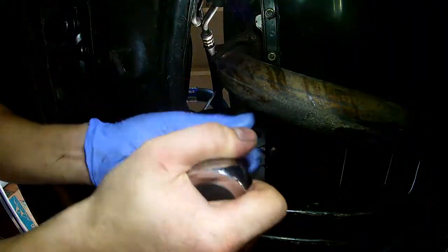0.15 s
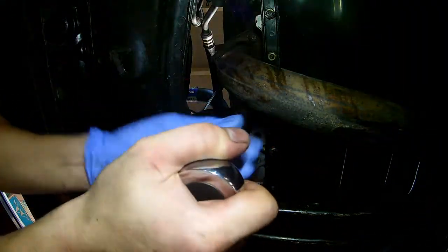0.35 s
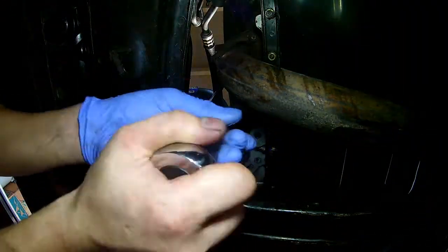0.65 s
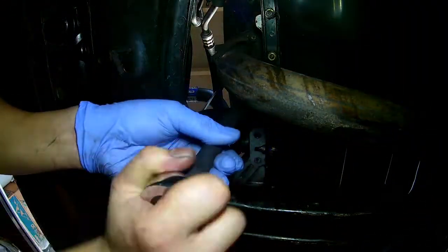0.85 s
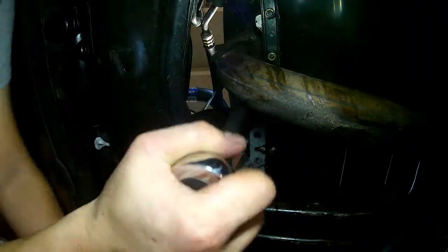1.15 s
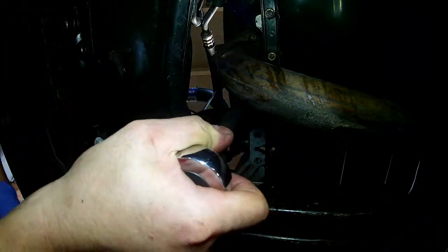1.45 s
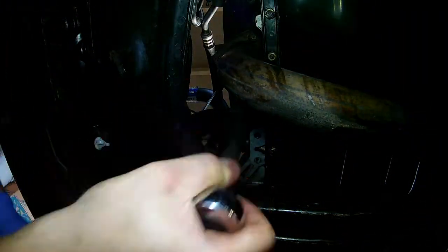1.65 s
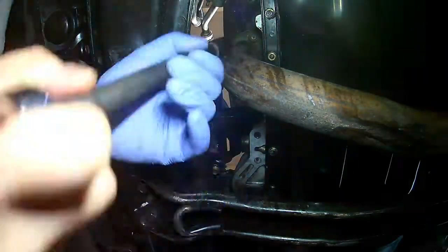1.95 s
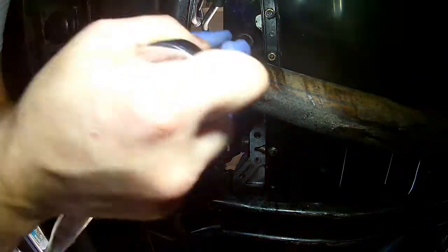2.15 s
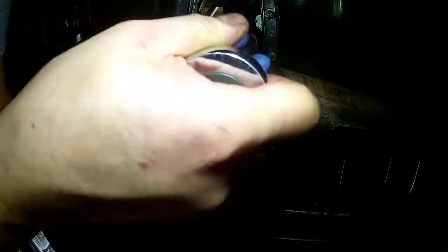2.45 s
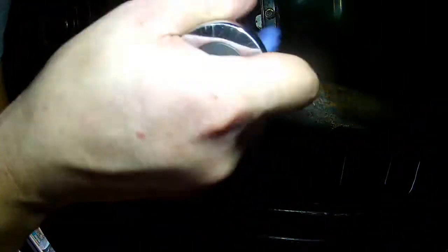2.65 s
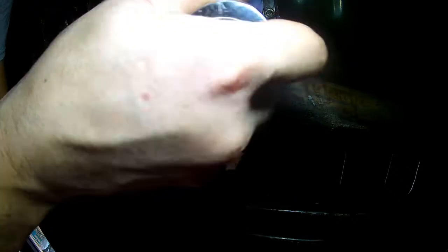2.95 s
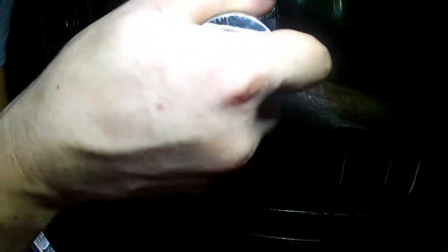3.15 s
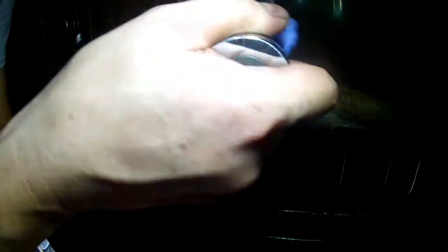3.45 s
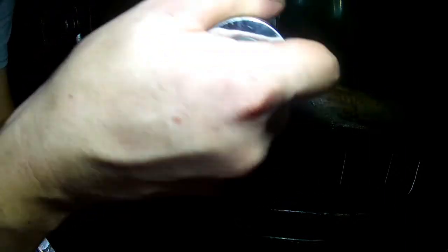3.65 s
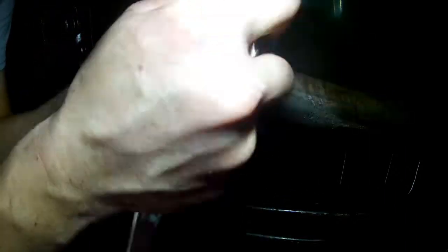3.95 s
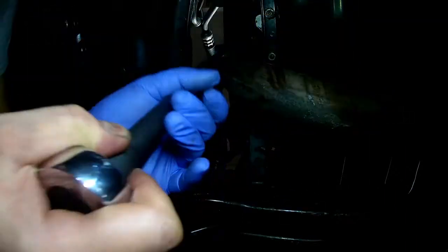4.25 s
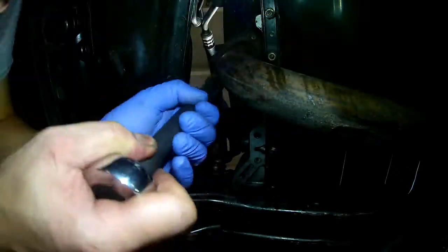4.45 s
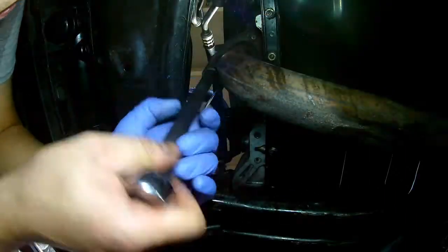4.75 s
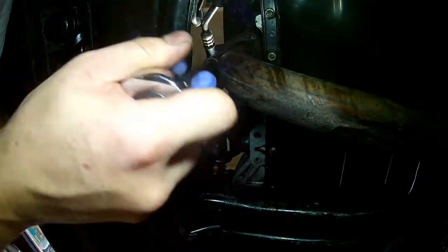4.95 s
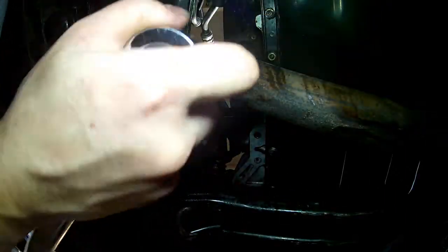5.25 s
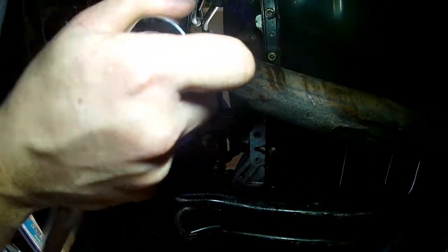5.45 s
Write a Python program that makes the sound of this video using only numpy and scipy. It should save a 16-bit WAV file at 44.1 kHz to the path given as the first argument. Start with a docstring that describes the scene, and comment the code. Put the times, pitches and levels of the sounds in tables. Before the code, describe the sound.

Time-lapse work under a car: scattered clicks of ratchet teeth, a dull knock, a sudden metallic clang, small squeaks and knocks, then a busy rattling run of clicks and rasps. Another clang cuts it off; thuds and a few last clicks follow. Low engine hum and a faint rising car whine lie behind a cheap, close microphone.

```python
"""A ratchet wrench works under a car in a garage: its pawl clicks over the teeth, metal rubs, the socket
knocks and twice clangs on the chassis. Time runs fast: only short pieces are kept and cross-faded, so every
click, knock and clang is cut off where its piece ends. Far traffic rumbles outside and a car pulls away.
Noise bursts and steady noise through resonances make the metal, sines the clangs, engine and gear whine;
the microphone housing cuts two treble bands and the electronics hiss."""
import sys
import numpy as np
from scipy.fft import rfft, irfft, next_fast_len
from scipy.io import wavfile
from scipy.ndimage import uniform_filter1d, map_coordinates

SR = 44100
rng = np.random.default_rng(int(sys.argv[2]) if len(sys.argv) > 2 else 0)


def unload_wav(signal):
    """Save mono or channel-first audio to the path in sys.argv[1] as 16-bit WAV at rate SR, clipped to [-1, 1]."""
    wavfile.write(
        sys.argv[1],
        SR,
        np.round(np.clip(np.atleast_2d(signal).T, -1, 1) * 32767).astype(np.int16),
    )


N = 247401

STEP, FIRST, FADE = .042, -.026, .008  # piece spacing, first start, cross-fade (s)
COUNT, SIZE = 135, 4096  # pieces, samples worked out for each
T = np.arange(SIZE) / SR  # time within a piece (s)
HZ = np.fft.rfftfreq(SIZE, 1 / SR)


def amp(db):
    """Amplitude factor of a level in dB."""
    return 10 ** (np.asarray(db) / 20)


def along(points, hz):
    """Values at hz between (Hz, value) points on a log frequency axis."""
    point_hz, value = np.transpose(points)
    return np.interp(np.log(hz + 1), np.log(point_hz + 1), value)


def coloured(x, gain):
    """Rows through a causal minimum-phase filter with the shape of gain, scaled to energy 1."""
    cepstrum = irfft(np.log(gain + 1e-5 * gain.max()), SIZE)
    # folding the cepstrum forward in time makes the filter causal
    cepstrum[..., 1:SIZE // 2] *= 2
    cepstrum[..., SIZE // 2 + 1:] = 0
    response = np.exp(rfft(cepstrum))
    size = np.sqrt(np.mean(gain ** 2, axis=-1, keepdims=True))
    return irfft(rfft(x) * response / size, SIZE)


def place(s, early):
    """The piece that holds a moment, and time since it; early (s) in a cross-fade the ending piece holds it."""
    k = int((s - FIRST - early) / STEP)
    return k, np.maximum(T - (s - FIRST - k * STEP), 0)


def spliced(pieces):
    """Each piece keeps one step plus the fade and overlaps the next."""
    window = np.clip(np.minimum(T, STEP + FADE - T) / FADE, 0, 1)
    start = np.round(np.arange(COUNT) * STEP * SR).astype(int)
    index = start[:, None] + np.arange(SIZE)
    joined = np.bincount(index.ravel(), (pieces * window).ravel())
    return joined[round(-FIRST * SR):][:N]


def wash(db, spectrum):
    """Noise that starts anew in every piece, at a slightly new level."""
    gain = amp(db + rng.normal(0, .9, COUNT))[:, None]
    return gain * coloured(rng.standard_normal((COUNT, SIZE)), amp(along(spectrum, HZ)))


def note(table, rate, pitch_waver, waver_db):
    """One far sine tone that wavers in pitch (fraction) and strength, rate times a second."""
    s, hz, db = np.transpose(table)
    t = np.arange(N) / SR
    pitch_drift, level_drift = (map_coordinates(rng.standard_normal(1000), [t * rate]) for _ in range(2))
    pitch = np.interp(t, s, hz) * (1 + pitch_waver * pitch_drift)
    level = amp(np.interp(t, s, db) + waver_db * level_drift)
    return level * np.sin(2 * np.pi * np.cumsum(pitch) / SR)


def modes(table, between_db, scatter_db, ripple_db):
    """Resonance peaks over a rippled base of many small modes, at new strengths in each piece."""
    ripple = uniform_filter1d(rng.standard_normal((COUNT, len(HZ))), size=6) * np.sqrt(6)
    gain = np.full(ripple.shape, amp(between_db))
    for hz, width, db in table:
        strength = amp(db + rng.normal(0, scatter_db, (COUNT, 1)))
        gain += strength / np.hypot(1, 2 * (HZ - hz) / width) ** 2
    return gain * amp(ripple_db * ripple)


def blows(times, dbs, t60, tail_db, tail_t60, rise, early=.003):
    """Noise bursts in their pieces: faint noise swells into a short crack, then a ring dies more slowly."""
    out = np.zeros((COUNT, SIZE))
    for s, db in zip(times, dbs):
        k, t = place(s, early)
        lead = amp(-19.5) * np.exp(-np.abs(T - (s - FIRST - k * STEP)) / 0.0026)
        crack = amp(-60 * t / t60)
        ring = amp(tail_db - 60 * t / tail_t60)
        out[k] += amp(db) * ((crack + ring) * (1 - np.exp(-t / rise)) + lead)
    return out * rng.standard_normal(out.shape) * (T < STEP + FADE)


def steady(starts, dbs, swell_db):
    """Grainy noise that lasts through the named pieces, swelling or fading across each."""
    gain = np.zeros((COUNT, SIZE))
    across = np.clip(T / (STEP + FADE), 0, 1) - .5
    piece = np.round((starts - FIRST) / STEP).astype(int)
    gain[piece] = amp(dbs[:, None] + swell_db[:, None] * across)
    grain = uniform_filter1d(rng.standard_normal((COUNT, SIZE)), size=130) * np.sqrt(130)  # about 3 ms
    return gain * amp(2.2 * grain) * rng.standard_normal((COUNT, SIZE))


# Drone of far engines outside the garage. Each row: time in seconds, level in dB.
DRONE_LEVEL = [(0, -47), (1.3, -41.5), (3.4, -42.5), (4.08, -43), (4.44, -42.5), (5.05, -45.5), (5.61, -50)]
# Colours of the drone, the rumble and the tyre wash. Each row: frequency in Hz, relative density in dB per Hz.
DRONE_COLOUR = [(7.1, -49), (12, -17), (27, -3.5), (80, 2), (105, -4.5), (124, -7.5), (150, -2), (200, -35),
                (330, -120)]
RUMBLE_COLOUR = [(76, -30.5), (130, -5.5), (188, -5), (269, -10.5), (450, -20.5), (580, -40), (990, -120)]
TYRES_COLOUR = [(240, -31.5), (400, -8.5), (518, -3.5), (665, -11), (797, -2.5), (862, -3), (1260, -13.5),
                (1430, -13), (1730, -18.5), (1800, -19), (2600, -48), (3380, -75), (5720, -120)]
RUMBLE_DB, TYRES_DB = -43, -47


def traffic():
    """Far traffic outside: three bands of noise, engine drone, rumble and tyre wash."""
    middle = FIRST + (np.arange(COUNT) + .5) * STEP
    drone = wash(np.interp(middle, *np.transpose(DRONE_LEVEL)), DRONE_COLOUR)
    return drone + wash(RUMBLE_DB, RUMBLE_COLOUR) + wash(TYRES_DB, TYRES_COLOUR)


# A far engine's low note. Each row: time in seconds, centre pitch in Hz, centre level in dB.
ENGINE_NOTE = [(0, 91, -42), (.2, 74.7, -41.5), (.48, 97.2, -38), (.72, 96.6, -38.5), (.81, 75.65, -37.5),
               (1.11, 75, -31), (1.2, 87.3, -39), (1.5, 88.9, -39.5), (2.1, 97.9, -42), (2.9, 98.5, -46),
               (3.75, 108.3, -36), (4.05, 98.3, -41.5), (4.5, 111.7, -38), (5.61, 98.5, -38.5)]


def far_engine():
    """A far engine hums as one low, unsteady sine."""
    return note(ENGINE_NOTE, 30, .13, 2.5)


# A car pulls away through two gears. Each row: start in seconds, length in seconds, first pitch in Hz,
# last pitch in Hz, level in dB before the fades.
GEARS = [(1.849, 0.79, 1027, 1498, -49), (3.253, 1.02, 1033, 1630, -54)]
WHINE_RISE, WHINE_IN_S, WHINE_FADE_DB = 4.3, 0.13, 18  # how early pitch levels off, fade at each end, loss by the end


def gears():
    """Rows (s, Hz, dB): in each gear the pitch climbs fast, then levels off while the whine fades."""
    u = np.linspace(0, 1, num=30)
    climb = (1 - np.exp(-WHINE_RISE * u)) / (1 - np.exp(-WHINE_RISE))
    rows = []
    for s, length, low, high, db in GEARS:
        ends = np.clip(np.minimum(u, 1 - u) * length / WHINE_IN_S, 1e-3, 1)
        level_db = db - WHINE_FADE_DB * u ** 2 + 20 * np.log10(ends)
        rows.append((s + u * length, low + (high - low) * climb, level_db))
    return np.hstack(rows).T


def car_pulling_away():
    """The gear whine of the car is one sine that wavers about the climbing pitch."""
    return note(gears(), 80, 0.0245, 3.6)


# Narrow rings and squeaks. Each row: start of the first piece in seconds, number of pieces,
# centre frequency in Hz, width in Hz, centre level in dB.
SQUEAK_RINGS = [(1.78, 1, 3890, 130.4, -54), (1.864, 1, 3300, 91.5, -58), (1.948, 4, 3660, 129.7, -58),
                (2.116, 1, 3605, 98.8, -52), (1.948, 5, 11610, 400, -74), (2.032, 1, 5840, 200, -57),
                (4.51, 1, 10360, 404, -66), (5.392, 1, 581.4, 130, -46), (5.518, 3, 647, 190, -40)]
SQUEAK_WAVER, SQUEAK_SCATTER_DB = 0.011, 2  # from piece to piece: pitch (fraction), level


def squeaks():
    """Noise through one resonance, at a slightly new pitch and strength in each piece."""
    out = np.zeros((COUNT, SIZE))
    for s, pieces, hz, width, db in SQUEAK_RINGS:
        waver, size = rng.standard_normal((2, round(pieces), 1))
        centre_hz = hz * (1 + SQUEAK_WAVER * waver)
        peak = 1 / (1 + (2 * (HZ - centre_hz) / width) ** 2)
        noise = coloured(rng.standard_normal((len(size), SIZE)), peak)
        out[round((s - FIRST) / STEP):][:len(size)] += amp(db + SQUEAK_SCATTER_DB * size) * noise
    return out


# The two clangs. Each row: time in seconds, ring level in dB, 60 dB decay time of the ring in seconds,
# crash level in dB.
CLANGS = [(1.738, -12, 0.29, -15), (4.1806, -15, 0.37, -14.5)]
# Modes of the two struck chassis members. Each row: frequency in Hz, level against the ring level in dB.
RAIL_MODES = [(258, -4), (641, -6), (839, -5), (922, 0), (1228, 0), (1600, -5), (1820, -10), (1954, -7),
              (2235, -13), (2686, -20), (3214, -21), (3596, -22), (3801, -20), (4043, -21), (4172, -16),
              (5810, -30)]
ARM_MODES = [(236, -4), (400, -2), (447, -4), (715, -3), (978, 0), (1045, -5), (1480, -4), (1641, -4),
             (1830, -5), (1990, -9), (2300, -13), (2510, -12), (2990, -18), (3442, -11), (3994, -18),
             (5114, -19)]
# Colour of the crash. Each row: frequency in Hz, relative density in dB per Hz.
CRASH_COLOUR = [(71, -72), (120, -8), (480, -4.5), (1230, -8), (1360, -13.5), (1600, -7), (3020, -18),
                (4110, -19), (6500, -30), (15800, -48.5)]


def clangs():
    """The socket slips and rattles on a chassis member: its modes ring unevenly over a crash of noise."""
    out = np.zeros((COUNT, SIZE))
    for (s, db, t60, crash_db), member in zip(CLANGS, (RAIL_MODES, ARM_MODES)):
        k, t = place(s, 0)
        for hz, level_db in member:
            # bounces feed and damp each mode
            rattle_db = 2.2 * map_coordinates(rng.standard_normal(16), [T * 80])
            envelope = amp(rattle_db - 60 * t / t60) * (1 - np.exp(-t / 0.0013))
            out[k] += amp(db + level_db) * envelope * np.sin(2 * np.pi * (hz * t + rng.random()))
        crash = blows([s], [crash_db], 0.069, 2, 0.84 * t60, 0.0021, early=0)
        out += coloured(crash, amp(along(CRASH_COLOUR, HZ)))
    return out


# Back-swings of the ratchet. Each row: first click in seconds, length in seconds, number of teeth,
# first click level in dB before trims, change to the last click in dB, click treble against the click in dB
# before trims, scrape level in dB, body level in dB, swell across the piece in dB (the body takes 0.73 of it).
BACK_SWINGS = [(0.0638, .0191, 2, -14.5, -2, -5.5, -35, -55, -4),
               (0.155, 0.024, 3, -21.5, 2, -2, -34, -37.5, -4),
               (.2361, 0.018, 2, -20, -0.8, -2.5, -37.5, -39.5, 13),
               (0.3668, 0.024, 2, -17.5, -2.5, -5, -36, -54, -12),
               (0.4761, 0, 1, -21.5, 0, -0.5, -51, -51, 21), (0.6431, 0, 1, -41.5, 0, 2.5, -60, -57.5, 21),
               (0.8678, 0, 1, -19.5, 0, -6, -43.5, -44, -22), (1.6979, 0.0025, 1, -35, 0, -2, -66, -55, 17),
               (2.431, 0.0053, 1, -17, 0, -7.5, -40, -50, 3),
               (2.4602, 0.025, 2, -11, 0.5, -11, -36, -39, 5),
               (2.6071, 0, 1, -16.5, 0, -8.5, -36.5, -40.5, -9),
               (2.6749, 0.029, 3, -16, -0.5, -6.5, -33, -39.5, 6),
               (2.7504, 0.035, 3, -17.5, 4, -10, -33.5, -40.5, 0),
               (2.8337, 0.035, 4, -16, -2.5, -5.5, -35, -38.5, -14),
               (2.9196, 0.044, 4, -13, -7.5, -8, -41, -42.5, 3),
               (3.054, .0212, 3, -22, 2, -1.5, -33, -42, 4),
               (3.1405, 0.028, 3, -20.5, 3, -1.5, -37.5, -41.5, 14),
               (3.1951, 0, 1, -17.5, 0, -8, -39, -44, -12), (3.26, 0.028, 3, -18, -.8, -4.5, -35, -41, -4),
               (3.3875, 0.024, 2, -16, -8, -5.5, -34, -42, -25),
               (3.4729, 0.029, 3, -17, 1, -8.5, -36, -42.5, 17.5),
               (3.5404, 0, 1, -35.5, 0, -19, -43.5, -48, -10),
               (3.5946, .0352, 3, -14.5, -11, -10, -30, -39.5, -7),
               (3.721, 0.015, 2, -15, -4, -10, -35.5, -42.5, -7),
               (3.9268, 0.0011, 1, -38.5, 0, -2.5, -55.5, -53.5, -26),
               (4.8657, 0, 1, -18, 0, -2.5, -43, -43.5, -11), (4.9656, 0, 1, -43, 0, 2, -64, -70, 21),
               (5.0247, 0.0028, 1, -19.5, 0, -4.5, -55, -51, -18),
               (5.0808, 0, 1, -17, 0, -4.5, -45, -42.5, 3),
               (5.1066, 0.0079, 1, -18, 0, -7, -42.5, -38.5, -13),
               (5.2432, 0.013, 2, -15.5, -2, -2.5, -36.5, -36, 19.5),
               (5.3216, 0.014, 2, -18, -1, -9, -40, -41.5, .6), (5.4542, 0, 1, -43.5, 0, -6, -64, -54, -10)]
QUICKEN = 0.92  # each gap between teeth over the one before


def pawl():
    """Rows (s, click dB, treble dB): the teeth of a stroke come ever faster."""
    rows = []
    for first, length, teeth, db, change_db, treble_db, *_ in BACK_SWINGS:
        way = 1 - QUICKEN ** np.arange(round(teeth))
        for u in way / max(way[-1], 1e-9):
            rows.append((first + u * length, db + u * change_db, treble_db))
    return np.transpose(rows)


# Faint rustle of hands on the tool. Each row: time in seconds, centre level in dB.
HANDS_RUSTLE = [(0, -65), (.55, -64.5), (.72, -74), (.97, -72), (1.6, -80), (1.7, -66), (2.1, -70),
                (2.2, -81.5), (2.4, -73), (3, -66.5), (3.8, -67.5), (4.03, -67.5), (4.1, -79), (4.3, -70),
                (4.45, -68.5), (5, -81), (5.45, -69), (5.61, -68)]
# The treble and body are against the rustle; the scatter and random swell are from piece to piece.
HANDS_TREBLE_DB, HANDS_BODY_DB, HANDS_SCATTER_DB, HANDS_SWELL_DB = -12, 8, 1, 12
# Rubbing, lead-ins and fading remainders of clicks and clangs, one piece each. Each row: piece start in
# seconds, level in dB, treble against it in dB, body level in dB, swell across the piece in dB
# (the body takes 0.73 of it).
RUBBING_AND_TAILS = [(-.026, -49, -6, -45, -14), (.268, -50, -9, -48, -31), (.772, -66, -15, -61, 3),
                     (.814, -47, -6.5, -47, 5), (.898, -54.5, -8, -41, -18), (1.234, -55, -8, -48, -21),
                     (1.528, -57.5, -17, -50.5, -12), (1.57, -55, -12, -44.5, -14.5),
                     (1.78, -59, -12, -41.5, -4), (1.822, -54, -24, -46, 21), (1.864, -68, -12, -52, 0),
                     (1.948, -61, -1.5, -53, 7), (1.99, -62, -7, -55, -11), (2.032, -53, -10, -41.5, -9.5),
                     (2.116, -57, -7, -48.5, -4), (2.494, -61, -14, -48.5, -19),
                     (2.956, -50, -5, -42.5, -19), (3.334, -59, -9, -53.5, 22), (3.88, -62.5, -7, -60, -13),
                     (4.216, -67, -8, -44, -13), (4.342, -66, -19, -45, -19), (4.426, -66, -17, -61, 19),
                     (4.51, -55.5, -15, -52, -3), (4.594, -58, -13, -55, 26.5),
                     (4.762, -63, -11.5, -44, -10), (4.804, -60, -3, -68, 4), (5.392, -58, -23, -53, 1)]
STROKE_TREBLE_DB = -6.5  # of the scrape under a stroke, against its level
# The piece after a stroke. One row: level against the scrape in dB, treble against that in dB,
# body level in dB, swell in dB (the body takes 0.73 of it).
AFTER_STROKE = (-26.5, -7, -59, -7)


def rubbing():
    """Rows (start s, level, treble, body, swell dB) by piece: hands rustle unless a stroke, rub or tail fills it."""
    start = FIRST + STEP * np.arange(COUNT)
    chance = rng.standard_normal((COUNT, 3))
    db = np.interp(start + STEP / 2, *np.transpose(HANDS_RUSTLE)) + HANDS_SCATTER_DB * chance[:, 0]
    treble_db = np.full(COUNT, HANDS_TREBLE_DB)
    hands_body_db = db + HANDS_BODY_DB + HANDS_SCATTER_DB * chance[:, 1]
    rows = np.array([start, db, treble_db, hands_body_db, HANDS_SWELL_DB * chance[:, 2]])
    for first, *_, scrape_db, body_db, swell_db in BACK_SWINGS:
        k = place(first, .003)[0]
        rows[1:, k] = scrape_db, STROKE_TREBLE_DB, body_db, swell_db
        after_db = scrape_db + AFTER_STROKE[0]
        if after_db > db[k + 1]:  # only where it is louder than the hands
            rows[1:, k + 1] = after_db, *AFTER_STROKE[1:]
    for s, *sound in RUBBING_AND_TAILS:
        rows[1:, round((s - FIRST) / STEP)] = sound
    return rows


# Dull knocks of hand and socket. Each row: time in seconds, body level in dB,
# edge against the body in dB before a trim.
DULL_KNOCKS = [(0.787, -50, -3), (1.2479, -26.5, -2.5), (1.5301, -42, -0.5), (1.575, -42, -14),
               (1.799, -41, -1), (1.8522, -21, -7), (1.956, -47, -11), (1.994, -40.5, 3),
               (2.056, -35.5, -2.5), (3.234, -49, 3), (4.3475, -42, 1.5), (4.4622, -30.5, -3.5),
               (4.6335, -31.5, -3), (4.7651, -37.5, -9), (5.4139, -37, 3), (5.5249, -55, 3)]
# Colours of the body and the edge. Each row: frequency in Hz, relative density in dB per Hz.
BODY_COLOUR = [(150, -39), (250, -8), (966, 2.5), (1470, -3.5), (2120, -5), (2600, -8.5), (3380, -29),
               (5720, -120)]
EDGE_COLOUR = [(1290, -32), (2200, -10.5), (3100, -1), (4170, -1.5), (4950, -13), (10000, -25),
               (13000, -54)]


def knocks(rub):
    """Dull contacts: a low body and a brighter edge; the pawl shakes the body a little too."""
    s, db, edge_db = np.transpose(DULL_KNOCKS)
    start, _, _, body_db, swell_db = rub
    click_s, click_db, _ = pawl()
    body = blows(s, db, 0.041, -3.4, 0.14, 0.00071)
    body += steady(start, body_db, 0.73 * swell_db)
    body += blows(click_s, click_db - 23.0, 0.017, -8.5, 0.085, 0.00084)
    edge = blows(s, db + edge_db + 1.5, 0.022, -16, 0.12, 0.00053)
    panel = modes([], between_db=0, scatter_db=0, ripple_db=4.5)
    return coloured(body, panel * amp(along(BODY_COLOUR, HZ))) + coloured(edge, panel * amp(along(EDGE_COLOUR, HZ)))


# Resonances of the wrench. Each row: frequency in Hz, width in Hz, centre level in dB before the colour below.
WRENCH_MODES = [(1904, 310, 6.5), (2576, 80, 5), (2995, 99, -6.5), (3753, 154, -5.5), (5010, 47, -5),
                (5586, 860, -1.5), (7450, 214, 6), (8740, 780, -0.5), (9600, 100, 2.5), (10060, 70, 6),
                (11460, 650, -1), (14200, 220, 1)]
# Colour of the steel. Each row: frequency in Hz, relative density in dB per Hz.
STEEL_COLOUR = [(760, -48.5), (1300, -19), (2790, -11), (3980, 1.5), (4370, -4), (7370, -7.5),
                (8010, -17.5), (8710, -16.5), (11400, -13.5), (15800, -37.5)]


def wrench(rub):
    """Pawl clicks and rubbing ring the same steel; above about 8 kHz each has its own treble level."""
    s, db, treble_db = pawl()
    start, rub_db, rub_treble_db, _, swell_db = rub
    steel = amp(along(STEEL_COLOUR, HZ)) * modes(WRENCH_MODES, between_db=-2.0, scatter_db=3.5, ripple_db=2.5)
    low = blows(s, db + 3.5, 0.012, -16.5, 0.039, 0.00073)
    low += steady(start, rub_db, swell_db)
    high = blows(s, db + treble_db + 3, 0.0099, -14.5, 0.045, 0.0009)
    high += steady(start, rub_db + rub_treble_db, swell_db)
    share = np.clip((HZ - 7500) / 1000, 1e-3, 1 - 1e-3)  # crossover from low to high
    return coloured(low, steel * (1 - share)) + coloured(high, steel * share)


def scene():
    """The cut-up work and traffic noise, with the far engine and gear whine running on uncut."""
    rub = rubbing()
    pieces = traffic() + squeaks() + clangs() + knocks(rub) + wrench(rub)
    return (spliced(pieces) + far_engine() + car_pulling_away())[None]


# Microphone housing. Each row: centre in Hz, half-width in Hz where the dip in dB falls to 1/e, depth in dB.
HOUSING_NOTCHES = [(7960, 463, -14), (13600, 450, -10)]
# Colour of the electronics' hiss. Each row: frequency in Hz, relative density in dB per Hz.
HISS_COLOUR = [(1180, -37), (2000, -5), (2260, -4.5), (3450, -9), (3830, -11), (7380, -23), (7910, -16.5),
               (10100, -15.5), (13400, -17.5), (15800, -13.5)]
TOP_HZ = 16000  # band limit


def record(dry):
    """The input rounds off loud peaks, the housing dips two treble bands, hiss joins, and the top is cut."""
    m = next_fast_len(N + 8192)
    hz = np.fft.rfftfreq(m, 1 / SR)
    dips_db = sum(db * np.exp(-((hz - centre_hz) / width) ** 2) for centre_hz, width, db in HOUSING_NOTCHES)
    rounded = dry / (1 + np.abs(dry / .95) ** 6) ** (1 / 6)
    hiss = spliced(wash(-69, HISS_COLOUR))
    heard = rfft(rounded, m) * amp(dips_db) + rfft(hiss, m)
    return irfft(heard * (hz < TOP_HZ), m)[:, :N]


dry = scene()
out = record(dry)
unload_wav(out)
```